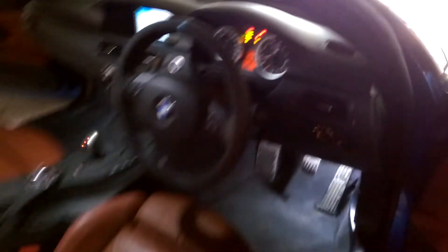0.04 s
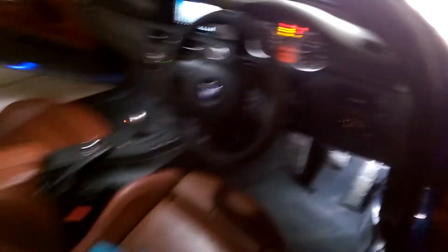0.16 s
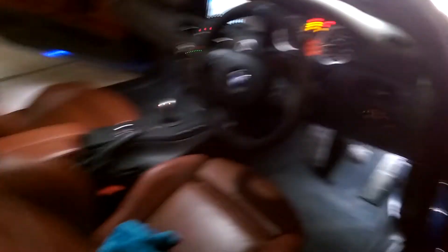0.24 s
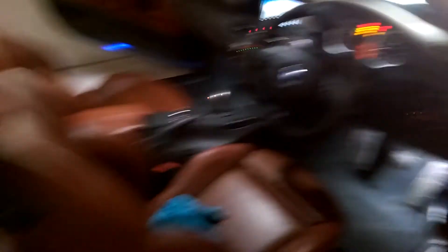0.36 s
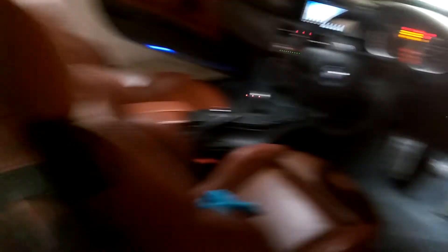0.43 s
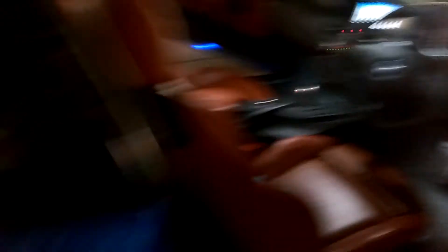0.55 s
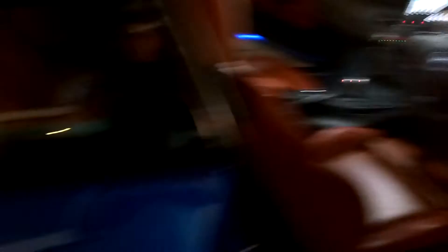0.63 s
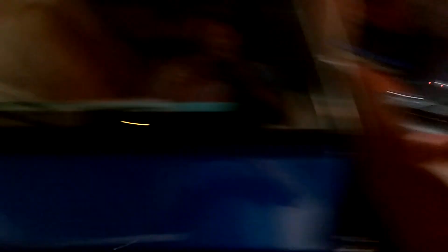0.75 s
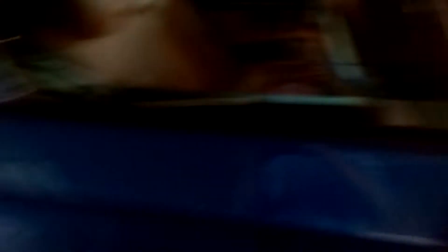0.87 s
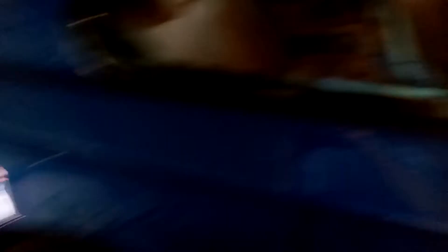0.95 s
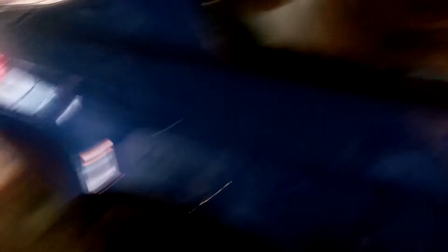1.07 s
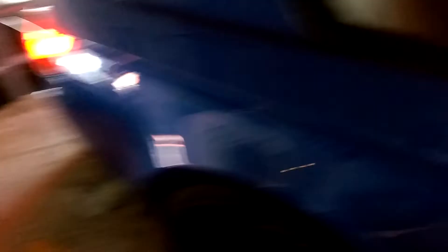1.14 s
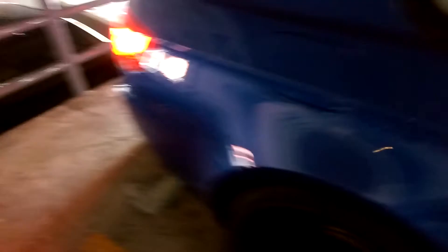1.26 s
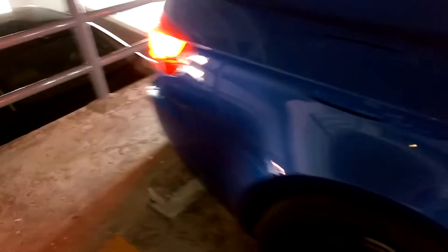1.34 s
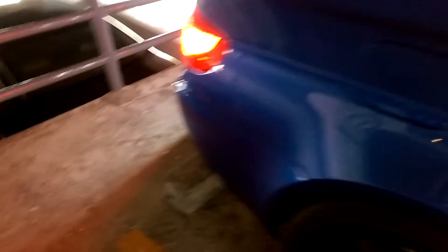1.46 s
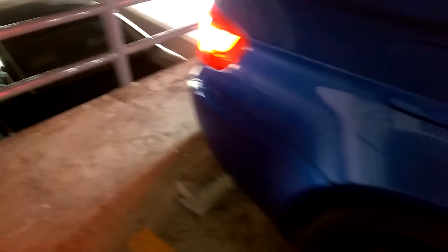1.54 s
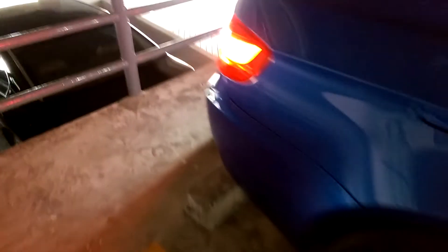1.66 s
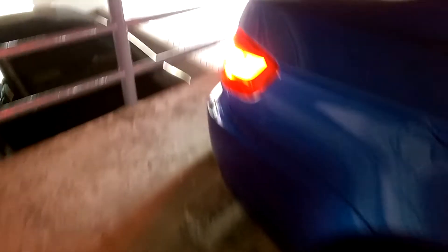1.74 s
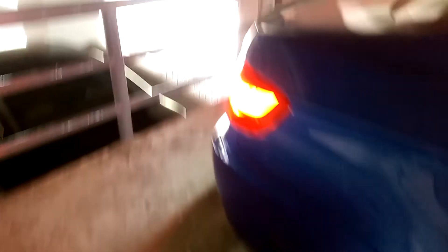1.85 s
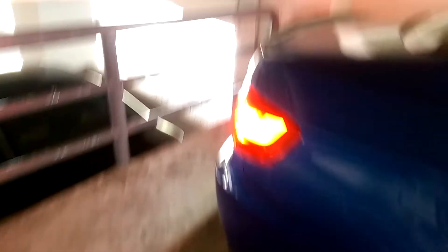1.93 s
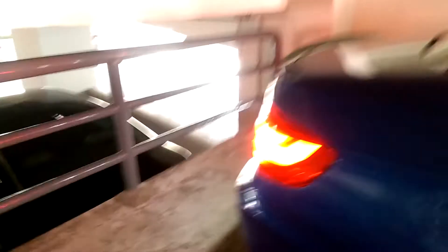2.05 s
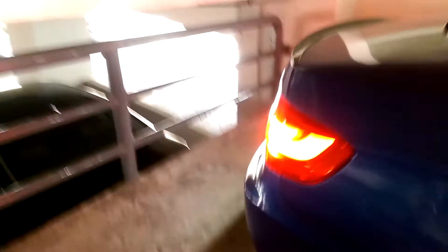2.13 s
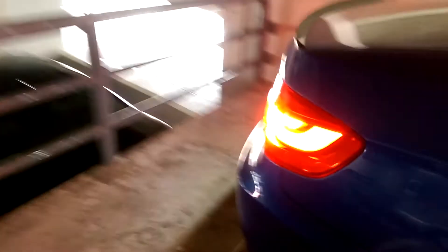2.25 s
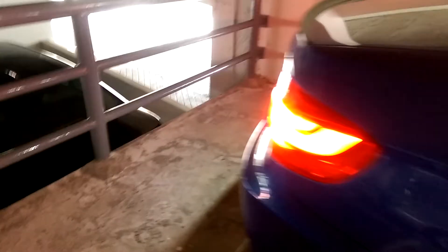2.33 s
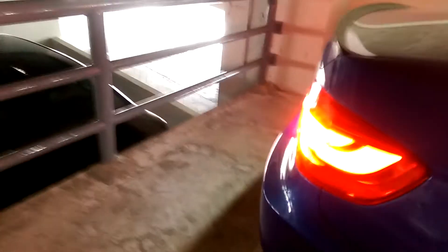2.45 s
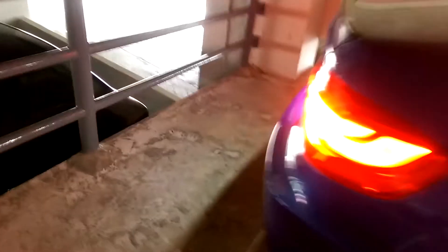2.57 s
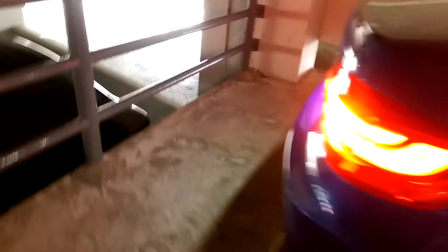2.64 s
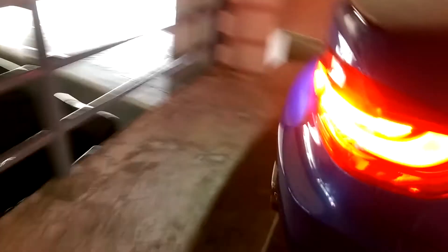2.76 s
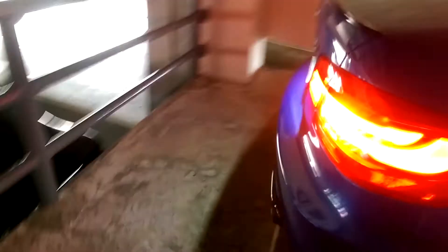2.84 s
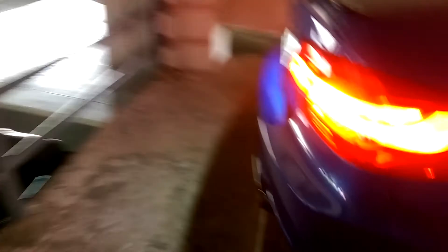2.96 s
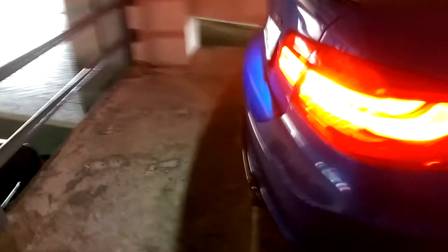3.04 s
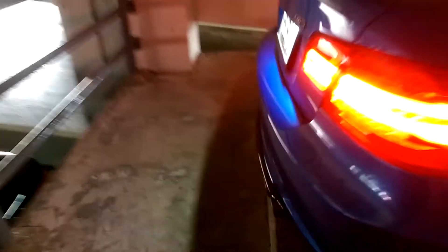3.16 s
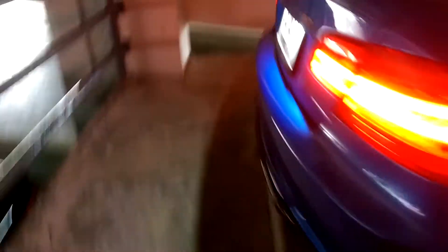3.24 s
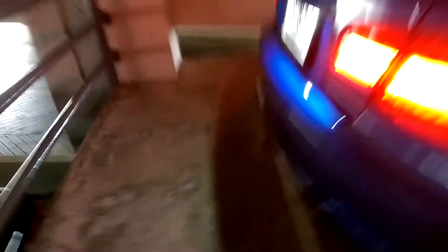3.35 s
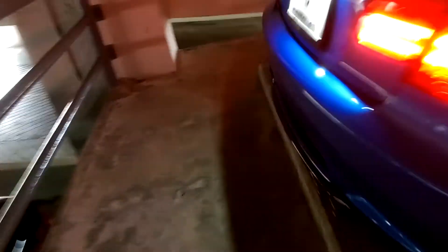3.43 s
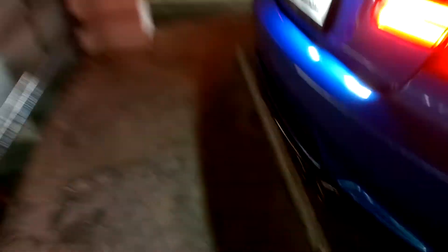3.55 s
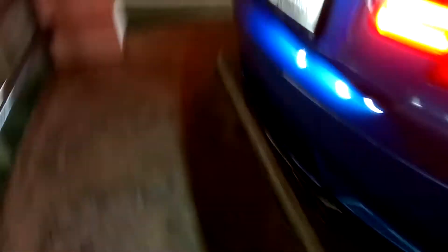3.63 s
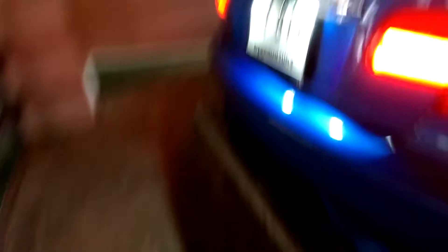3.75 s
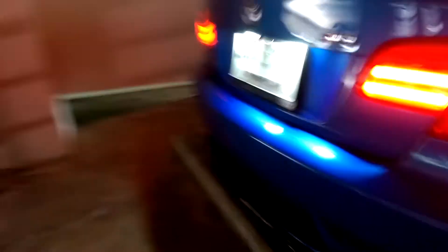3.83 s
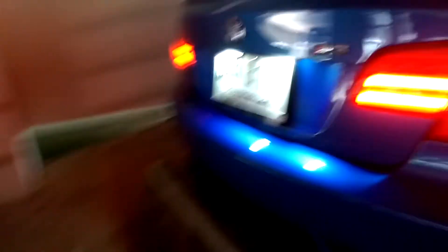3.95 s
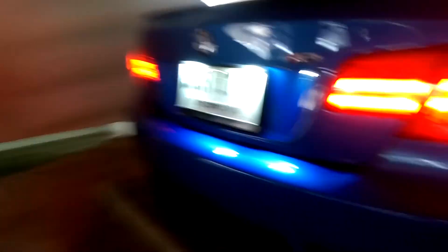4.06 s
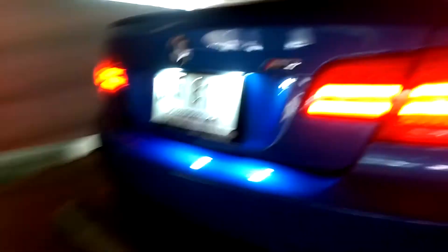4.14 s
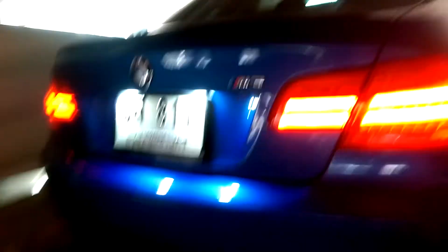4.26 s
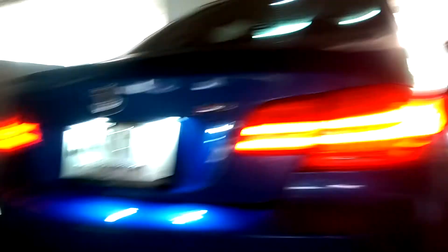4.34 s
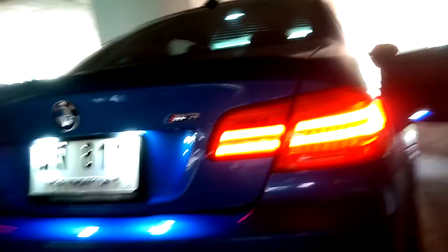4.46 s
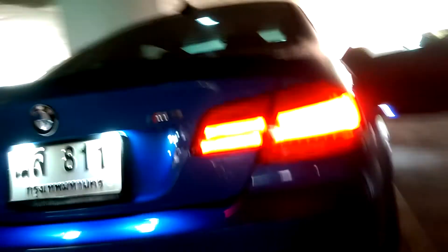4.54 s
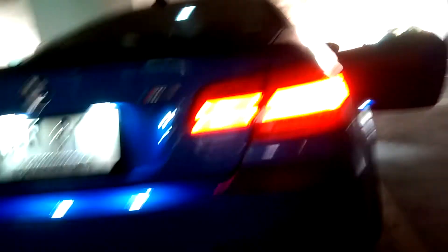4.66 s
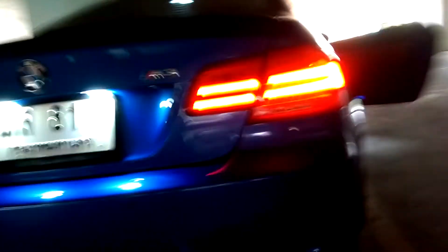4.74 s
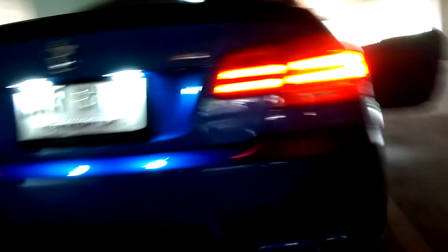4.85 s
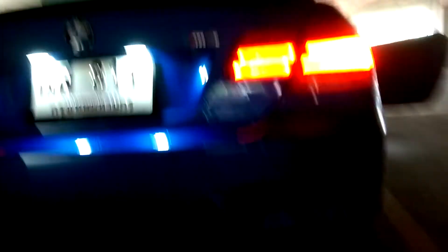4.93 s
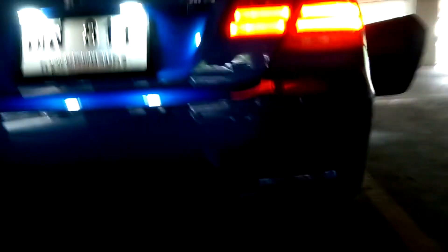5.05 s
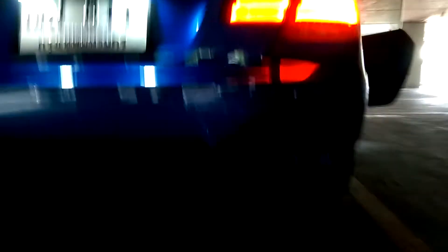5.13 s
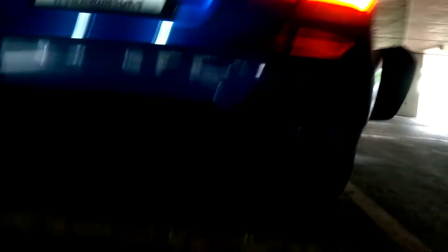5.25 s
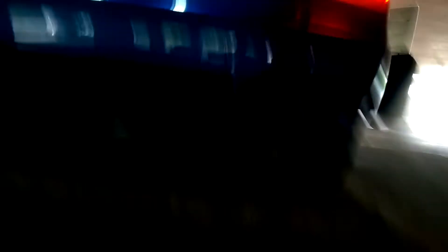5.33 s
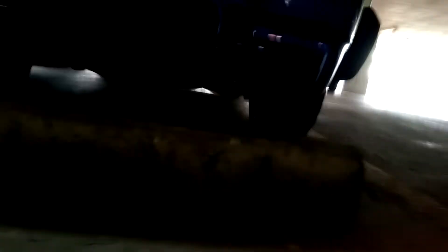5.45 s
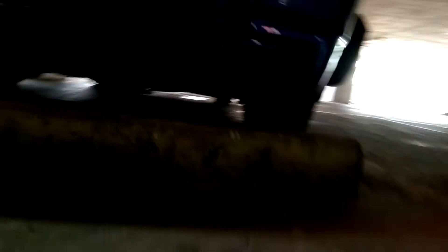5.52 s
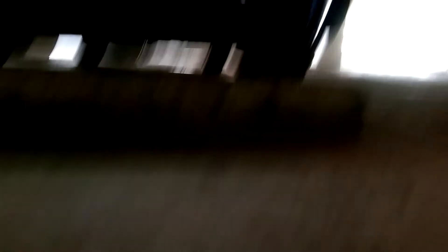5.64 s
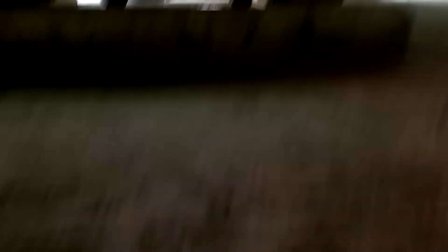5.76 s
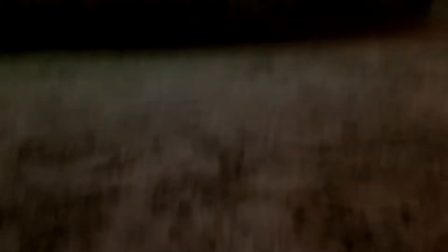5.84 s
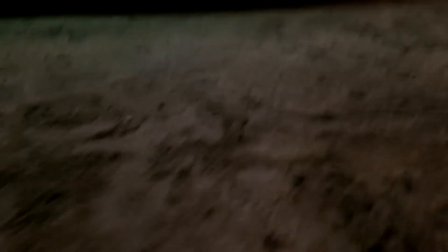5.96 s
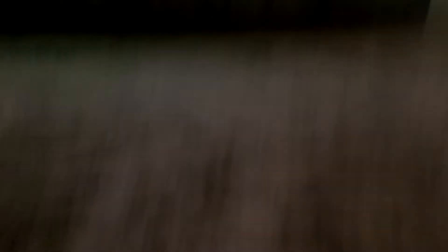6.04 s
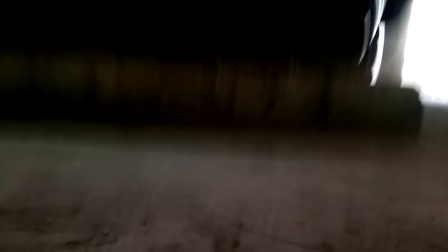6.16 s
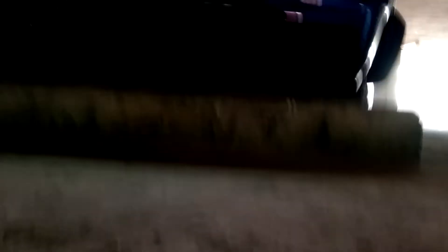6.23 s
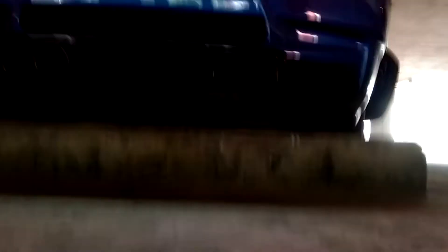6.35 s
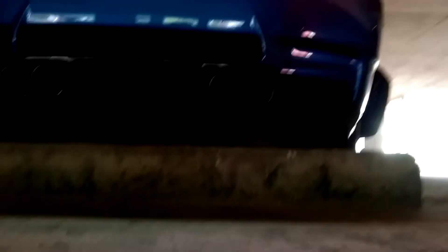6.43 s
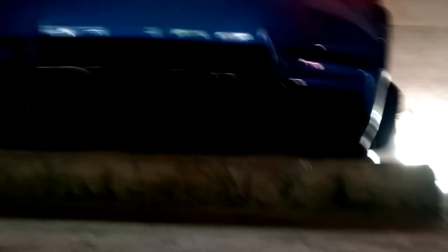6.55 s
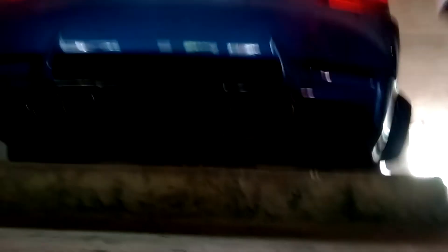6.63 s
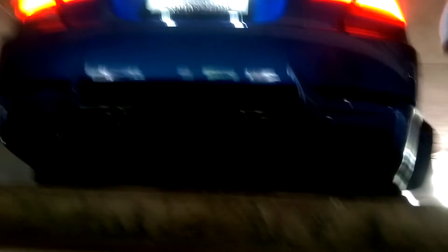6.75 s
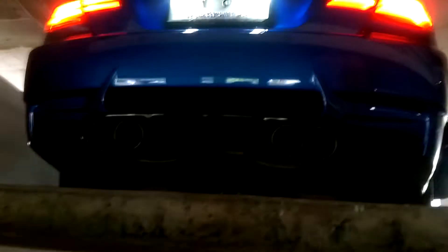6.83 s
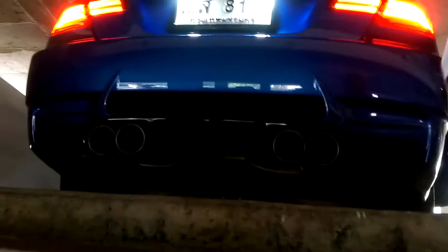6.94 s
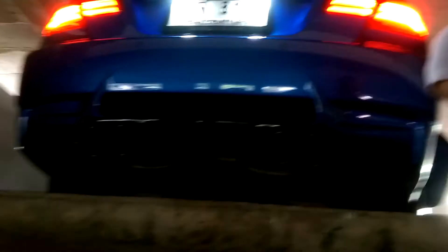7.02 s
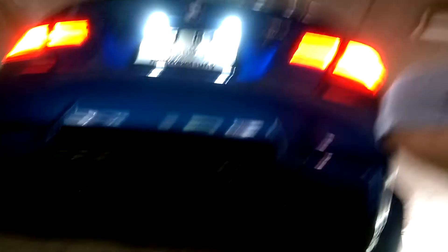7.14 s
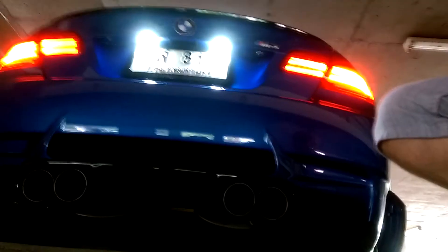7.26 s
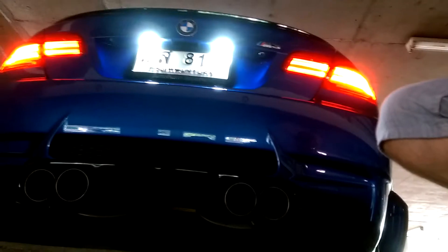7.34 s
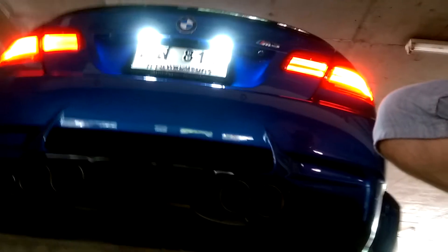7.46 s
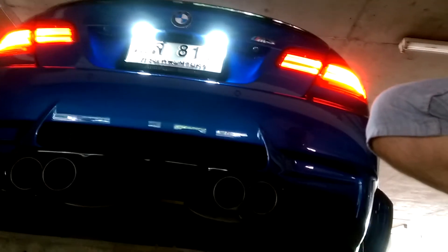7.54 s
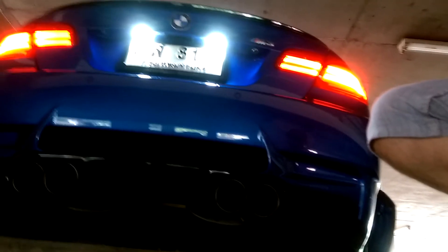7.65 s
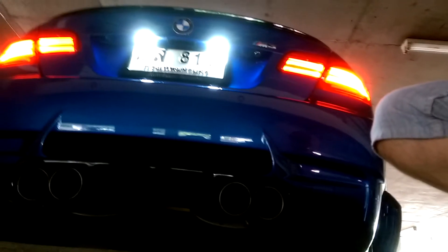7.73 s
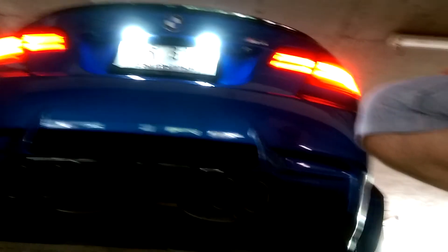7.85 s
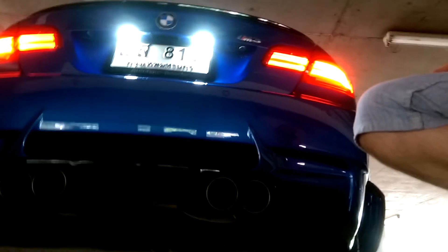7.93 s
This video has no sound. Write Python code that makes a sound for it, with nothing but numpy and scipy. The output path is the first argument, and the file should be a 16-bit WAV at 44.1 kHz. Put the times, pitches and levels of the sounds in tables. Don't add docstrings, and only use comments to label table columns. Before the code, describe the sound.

Handheld stereo microphone in a concrete garage. From an open car door, a V8 idles softly and deeply with faint mechanical clatter and whine. The level jumps early, wavers along the car's side, then swells strongly at the rear into a fluttering, throaty exhaust rumble with airy hiss. Small clothing rustles and left-side finger knocks interrupt; a hard cluster of thumps late on briefly dips the sound.

```python
import sys
import numpy as np
from scipy import signal
from scipy.io import wavfile
from scipy.ndimage import uniform_filter1d, minimum_filter1d, map_coordinates

SR = 44100
rng = np.random.default_rng(int(sys.argv[2]) if len(sys.argv) > 2 else 0)


def unload_wav(signal):
    wavfile.write(
        sys.argv[1],
        SR,
        np.round(np.clip(np.atleast_2d(signal).T, -1, 1) * 32767).astype(np.int16),
    )


def natural_amplitude(level_db):
    exponent = np.asarray(level_db, float) / 20
    return 10 ** exponent


N = 352359
T = np.arange(N) / SR

# time in seconds, firing rate in Hz, level of the deep garage mode in dB,
# loudness of the pipes in dB.
PIPE = [(0, 48.35, -18, -34), (.28, 50.76, -19.5, -30.5), (.42, 53.04, -24, -19.5),
        (.75, 51.72, -28, -18.5), (1.1, 51.4, -35, -19.5), (1.4, 50.9, -28, -22), (1.8, 52.1, -34, -18),
        (2.1, 52.74, -27, -21), (2.3, 51.4, -27, -20.5), (2.6, 51.8, -24, -22), (3.2, 52.8, -20.5, -19.5),
        (4, 52.15, -18, -14.5), (4.6, 51.3, -18, -16), (4.9, 52, -17, -12.5), (5.3, 52.9, -16, -7.5),
        (5.8, 54.32, -16.5, -6.5), (6.7, 54.19, -15.5, -6.5), (7.99, 53.46, -15, -8)]
# time in seconds, nearness from 0 to 1.
WALK = [
    (0, 0),
    (5.05, 0.15),
    (5.3, 0.56),
    (5.65, 0.88),
    (6.5, 0.98),
    (7.99, 0.87),
]
# time in seconds, share of the way down from 0 to 1.
LOWERED = [
    (0, 0),
    (5.2, 0.45),
    (6.3, 0.57),
    (6.75, 0.98),
    (7.5, 0.87),
    (7.99, 0.69),
]


def evened(x):
    return x / np.sqrt(np.mean(x ** 2) + 1e-20)


def read(points, hz):
    f, value = np.transpose(points)
    return np.interp(np.log(hz + 1), np.log(f + 1), value)


def curve(rows, t, axis):
    rows = np.asarray(rows)
    return np.interp(t, rows[:, 0], rows[:, axis])


def drift(per_s):
    knots = rng.standard_normal(2000)
    return evened(np.interp(T * per_s, np.arange(2000), knots))


def bump(s, length):
    return np.exp(-(2 * (T - s) / length) ** 2)


def soft_step(s, length):
    return .5 + .5 * np.tanh(2 * (T - s) / length)


def behind():
    return soft_step(4.24, 0.75)


def delayed(x, samples):
    return map_coordinates(x, [np.arange(N) - samples], order=3, mode="nearest")


def firings():
    cycles = np.cumsum(curve(PIPE, T, axis=1)) / SR
    return 2 * np.pi * (cycles - .33)


def throb(first, second):
    turn, near = firings(), curve(WALK, T, axis=1)
    return 1 + (.3 + .7 * near) * (first * np.cos(turn - 1) + second * np.cos(2 * turn - 2))


def wash(far, close, place, patchy_db, flicker_db):
    # frequency in Hz, likeness of the two ports from -1 to 1.
    likeness = [(60, 1), (130, 1), (290, 0.84), (640, 0.82), (1410, -0.11), (3100, 0.0081), (6820, -0.11),
                (15000, -0.00097)]
    # frequency in Hz, left minus right in dB.
    tilt = [(60, -7), (110, -1.5), (200, -2), (380, 0), (700, 4), (1290, 1), (2380, -1.5), (4400, 1.5),
            (8120, 1), (15000, -4)]
    frames, hz = N // 256 + 5, np.fft.rfftfreq(1024, 1 / SR)
    a, b, c, d, patches = rng.standard_normal((frames, 513, 5)).T
    smooth_in_hz = uniform_filter1d(patches, 6, 0)
    patches = evened(uniform_filter1d(smooth_in_hz, 16, 1))
    same = np.clip(read(likeness, hz), -1, 1)[:, None]
    left = a + 1j * b
    right = same * left + np.sqrt(1 - same ** 2) * (c + 1j * d)
    z = np.array([left, right])
    near = np.clip(curve(place, np.arange(frames) * 256 / SR, axis=1), 0, 1)
    far_colour, close_colour = [evened(natural_amplitude(read(s, hz)))[:, None] for s in (far, close)]
    z *= ((1 - near) * far_colour + near * close_colour) * natural_amplitude(patchy_db * patches)
    z *= natural_amplitude(np.array([.5, -.5])[:, None, None] * read(tilt, hz)[:, None])
    noise = signal.istft(z, nperseg=1024, noverlap=768)[1][:, :N]
    return evened(noise) * natural_amplitude(flicker_db * drift(30))


def past_hand(x):
    # time in seconds, frequency of the cancelled band in Hz.
    notch = [(0, 5120), (3.2, 4850), (3.7, 3520), (4.3, 4080), (5.5, 4200), (6.5, 4700), (7.3, 5280),
             (7.99, 5000)]
    share = .15 + .6 * soft_step(3.49, 0.75)
    dull = signal.filtfilt(*signal.butter(2, 7500, fs=SR), x[1])
    half_period = SR / 2 / curve(notch, T, axis=1)
    right = (x[1] + share * delayed(dull, half_period)) / (1 + 0.31 * share)
    return np.array([x[0], right])


def rustles():
    # time in seconds, length in seconds, level in dB.
    strokes = [(0.418, .06, -52.5), (0.833, .05, -65), (2.006, 0.055, -52), (2.673, .05, -54.5),
               (3.207, 0.047, -55), (3.28, 0.081, -56.5), (4.158, .06, -63.5), (4.45, 0.073, -66),
               (5.074, .06, -58), (5.304, .08, -57.5), (5.666, .07, -58), (5.815, 0.093, -61.5),
               (5.957, 0.067, -54), (6.098, .04, -61), (6.265, .05, -55), (6.7, .055, -56),
               (6.837, 0.038, -53.5), (7.418, .06, -58), (7.59, .07, -54)]
    # frequency in Hz, density in dB per Hz.
    cloth = [(2500, -32), (4000, -3), (6000, -3), (11000, -2.5), (15500, -8.5)]
    swell = sum(natural_amplitude(db) * bump(s, length) for s, length, db in strokes)
    return natural_amplitude(8.0) * swell * wash(cloth, cloth, WALK, 5.6, 1.5)


def knocks():
    # time in seconds, push in dB, push width in ms, ring in Hz, tick in dB.
    taps = [(.7705, -18, 0.16, 1300, -21), (.7711, -24, 0.51, 520, -45), (2.0686, -17, 0.14, 2000, -29),
            (2.0699, -18, .7, 305, -40), (.407, -45, .1, 300, -20), (2.0171, -2, .18, 205, -16.5),
            (6.7157, -50, .1, 398, -33), (7.1424, -11.5, 0.24, 392.1, -25), (7.1473, -4, 0.36, 799, -16),
            (7.1488, -3.5, 0.54, 283, -41), (7.171, -3, 0.34, 250, -28)]
    out, t = np.zeros(N), np.arange(-100, 800) / SR
    for s, push_db, width_ms, ring_hz, tick_db in taps:
        u = 1000 * t / width_ms
        push = -.7 * np.exp(-u ** 2) - 0.41 * np.exp(-abs(t) / 0.000088)
        rebound = 0.27 * np.exp(-(u - 3) ** 2)
        after = np.maximum(t - width_ms / 1000, 0)
        ring = np.sin(2 * np.pi * ring_hz * after) * np.exp(-after * ring_hz * 1.1)
        ring *= natural_amplitude(-11 + 29 * width_ms)
        tick_hz = 4560 - 35 * (tick_db + 17)
        tick = np.sin(2 * np.pi * tick_hz * t) * np.exp(-abs(t) / 0.0002)
        out[round(s * SR) - 100:][:900] += natural_amplitude(push_db) * (push + rebound + ring) + natural_amplitude(tick_db) * tick
    return out * np.array([[1], [.05]])


def roar():
    # frequency in Hz, density in dB per Hz.
    far = [(30, -12), (70, 0), (140, 5), (190, -8), (300, -9.5), (500, -14), (800, -23.5), (1200, -40)]
    close = [(30, -17), (70, -2.5), (140, 0), (190, -2), (300, -25.5), (430, -6.5), (650, -20),
             (900, -28.5), (1300, -49)]
    door_db = 2 * (.5 - soft_step(2, 1))
    db = -36.5 + 7.5 * curve(WALK, T, axis=1) + door_db
    return natural_amplitude(db) * throb(0.87, 0.37) * wash(far, close, WALK, 0.77, 0.61)


def hiss():
    # frequency in Hz, density in dB per Hz.
    far = [(2940, -23), (5000, -13.5), (7130, -5), (9160, -4.5), (10900, -3), (14700, -9.5), (15500, -10)]
    close = [(2940, -32.5), (5000, -7.5), (6130, 0), (9700, 1.5), (10700, -0.5), (13400, 0), (15500, -8)]
    near, low = curve(WALK, T, axis=1), curve(LOWERED, T, axis=1)
    db = -51 + 3.5 * near + 1.5 * low ** 3
    return natural_amplitude(db) * throb(0.057, 0.052) * wash(far, close, WALK, 0.73, .3)


def clatter():
    # frequency in Hz, density in dB per Hz.
    far = [(410, -31), (700, -8), (813, -6.5), (952, -6), (1050, -9), (1620, -6), (1780, -2.5), (2030, -5),
           (2400, -3.5), (2580, -5.5), (6500, -17.5), (8450, -52.5), (14300, -120)]
    close = [(410, -31.5), (700, -7.5), (917, -17), (988, -4.5), (1080, -11), (1420, -5.5), (1800, -13),
             (2530, -5.5), (4000, -17), (4910, -21.5), (6500, -40), (8450, -58), (14300, -120)]
    db = -41 + 3 * curve(LOWERED, T, axis=1) ** 3
    return natural_amplitude(db) * throb(0.052, 0.085) * wash(far, close, LOWERED, 0.94, .3)


def whines():
    # order of the firing rate, width in Hz, level beside the car in dB, behind it in dB.
    belts = [(9.46, 10, -49.5, -50), (12.79, 2.6, -64, -66.5), (18.18, 30, -56.5, -53.5),
             (34.83, 160, -62, -48), (46.76, 140, -53, -54)]
    # frequency in Hz, width in Hz, level beside the car in dB, behind it in dB.
    pumps = [(2825, 30, -60, -61.5), (3370, 8, -57, -71), (1802, 20, -58, -57.5), (10500, 15, -71, -75.5),
             (11040, 15, -73, -76.5), (11800, 15, -73, -77)]
    # whine (belts, then pumps, from 0), time in seconds,
    # length in seconds, swell in dB.
    swells = [(0, 0.77, 0.52, 5), (1, 1.34, 0.96, 19.5), (2, 2.15, 0.79, 7), (2, 4.324, 0.65, 8.5),
              (3, 7.8, 1.2, 5.5), (3, 7, 2, -12), (4, 1.74, 0.97, 7), (4, 3.6, 0.9, -12), (5, 7.3, .4, 16),
              (6, 0.032, .2, 8), (6, 0.91, .25, 7), (6, 7.6, .8, 12.5)]
    # time in seconds, rate in Hz.
    speed = [(0, 51.9), (4.8, 51.9), (5.7, 54.2), (6.5, 53.9), (7.99, 53.6)]
    out, turn = np.zeros((2, N)), 2 * np.pi * np.cumsum(curve(speed, T, axis=1)) / SR
    rear = behind()
    rows = [(order * turn, *rest) for order, *rest in belts]
    rows += [(2 * np.pi * hz * T, *rest) for hz, *rest in pumps]
    for k, (phase, width_hz, beside_db, behind_db) in enumerate(rows):
        fuzz = np.array([[drift(width_hz) for _ in range(2)] for _ in range(2)])
        tone = (fuzz[0] + 0.63) * np.cos(phase) + fuzz[1] * np.sin(phase)
        db = beside_db + (behind_db - beside_db) * rear
        db = db + sum(d * bump(s, length) for w, s, length, d in swells if round(w) == k)
        out += natural_amplitude(db - 2.5) * (tone + 0.23 * tone[::-1])
    return out


def puffs():
    # frequency in Hz, density in dB per Hz.
    gas = [(200, -30), (330, -5), (430, 0.5), (560, -11), (750, -11.5), (1000, -24.5), (1500, -42.5)]
    gate = evened(np.exp(1.6 * np.cos(firings() - 1)))
    near = curve(WALK, T, axis=1)
    return natural_amplitude(-42) * near ** 3 * gate * wash(gas, gas, WALK, 0.9, .5)


def exhaust():
    orders = [.75, 1.5, 1.75, 2.25, 2.5, 2.75, 3.25, 3.5, 4, 5, 6, 7, 8, 9, 10]
    far_levels = [-31, -42, -36, -24.5, -26.5, -37.5, -38, -29.5, -36, -25, -33.5, -42, -54, -41.5, -30.5]
    near_levels = [-34, -45, -25, -41, -24, -21, -30, -48.5, -18.5, -30, -35, -25, -23, -37.5, -29]
    nodes = {4: [(1.08, .15, 6), (1.4, .12, 6), (2.0, .12, 2)], 5: [(1.5, 1.4, -1.5), (3.2, 0.74, 14),
             (5.9, .8, -2.5)], 8: [(.1, .1, 28), (.69, 0.2, 4.5), (1.22, 0.11, 7), (1.38, 0.1, 1.5),
             (2.32, 0.12, 2.5), (2.65, 0.07, 2.5), (4.19, 0.075, 2.5), (4.93, 0.047, 11),
             (5.12, 0.088, 1.5)], 12: [(.27, 0.25, 23), (.72, .2, 18), (1.4, 0.26, 10), (2.2, 0.42, 15),
             (2.6, 0.16, 8), (4.6, .15, 6), (4.93, 0.093, 12)], 16: [(5.15, 0.47, 6), (7.3, 1.3, -1.5)],
             20: [(2.6, 1.16, 8), (4.3, 1.044, -2.5), (5.05, 0.31, 10.5)], 40: [(1.4, 1.9, 2),
             (4.95, 0.82, 14)]}
    turn, near, pipes_db = firings(), curve(WALK, T, axis=1), curve(PIPE, T, axis=3)
    floor_db = np.maximum(pipes_db, -22)
    lope_db = -37.5 + 5 * near
    strong = {4: curve(PIPE, T, axis=2), 5: lope_db, 8: pipes_db, 12: floor_db - 16.5}
    lag = {4: 0.46 - 1.96 * (1 - soft_step(1.4, 0.29)), 8: 0, 12: .5}
    weak = dict(zip(orders, zip(far_levels, near_levels)))
    out = np.zeros(N)
    for quarter in [*range(1, 42), 44, 48, 52]:
        order, whole = quarter / 4, quarter % 4 == 0
        rest = (-56.5, -56.5 if quarter < 42 else -41)
        far_db, near_db = weak.get(order, rest)
        weak_db = -2.5 + 1.088 * floor_db + (1 - near) * far_db + near * near_db
        uneven = {4: .2, 8: .15, 12: .8 - .55 * near}.get(quarter, .25 if whole else 1)
        db = strong.get(quarter, weak_db) + 2.2 * uneven * drift(14)
        db = db - sum(depth_db * bump(s, length) for s, length, depth_db in nodes.get(quarter, []))
        if quarter in lag:
            db = db + .6 * (1 - near) * drift(6)
        waver = np.minimum(uneven, .2 if whole and quarter != 12 else 1)
        dispersion = .5 * (order - 2) ** 2
        phase = lag.get(quarter, dispersion) + .45 * waver * drift(9)
        beat = 1 + 0.65 * near * np.cos(turn / 4) * (quarter == 32)
        out += beat * natural_amplitude(db) * np.cos(order * turn + phase)
    leaky = signal.lfilter(*signal.butter(1, 18, "high", fs=SR), out)
    late = delayed(leaky, -3 + 6 * behind())
    return np.sqrt(2) * np.array([natural_amplitude(0.51) * out, natural_amplitude(-1.34) * late])


def scene():
    # time in seconds, gain in dB.
    shade = [(0, 0), (.6, 1), (3.1, 0.5), (3.6, -1), (5.4, 0.5), (5.7, 0.5), (6.2, 0.5), (7.1, 0.5),
             (7.3, 2), (7.99, -1)]
    pan = natural_amplitude(np.array([-1 + 0 * T, 1 + curve(shade, T, axis=1)]))
    engine_bay = past_hand(clatter() + hiss()) + whines() + rustles()
    return exhaust() + puffs() + roar() + pan * engine_bay + knocks()


def roll_off(x):
    return signal.sosfilt(signal.butter(12, 15650, fs=SR, output="sos"), x)


def record(dry):
    # time in seconds, depth in dB, recovery in seconds.
    duck = (7.152, 10, .048)
    s, depth_db, back = duck
    duck_db = depth_db * (T > s) * np.exp(-np.maximum(T - s - .012, 0) / back)
    ducked = dry * natural_amplitude(-uniform_filter1d(duck_db, 150))
    peak = -minimum_filter1d(-abs(ducked).max(0), size=900)
    crest = uniform_filter1d(peak, size=500)
    held = ducked * np.minimum(1, .89 / crest) ** .8
    limited = held / (1 + (abs(held) / .95) ** 8) ** (1 / 8)
    return roll_off(limited)


dry = scene()
out = record(dry)
unload_wav(out)
```